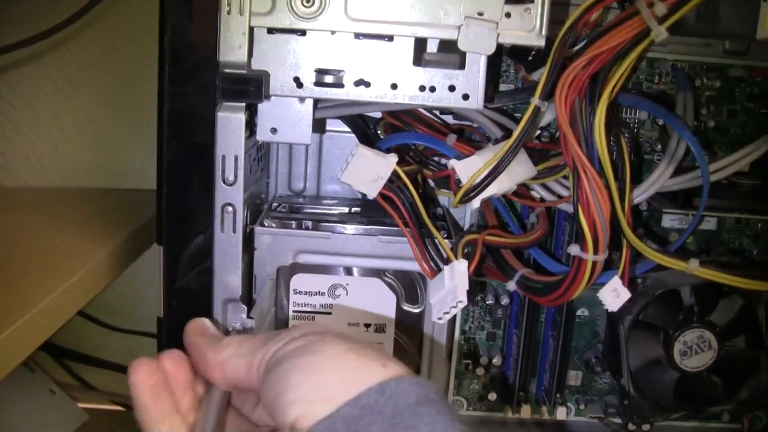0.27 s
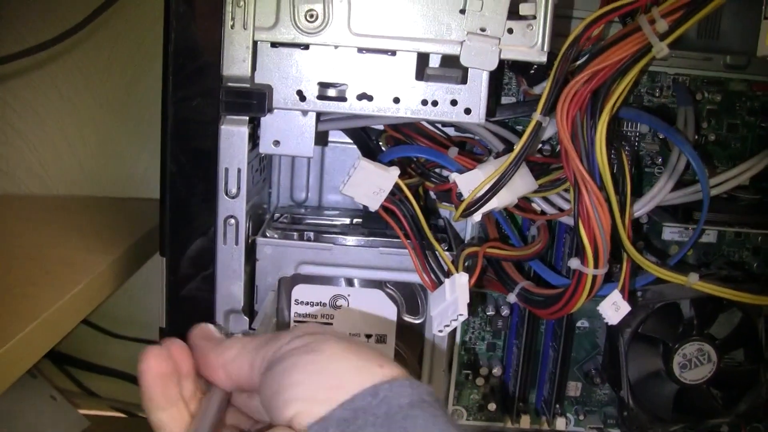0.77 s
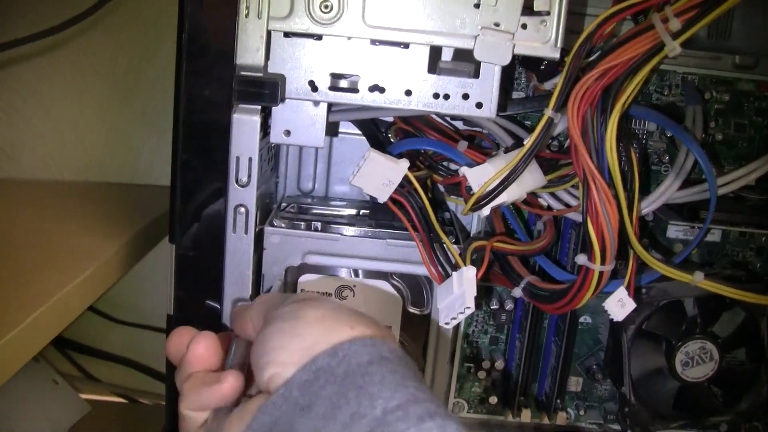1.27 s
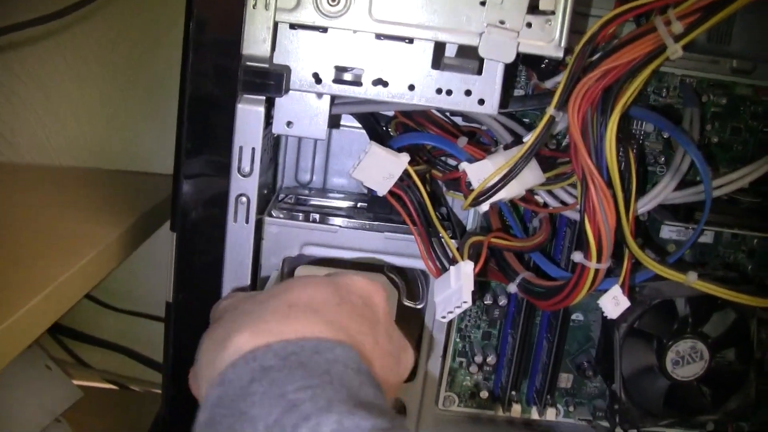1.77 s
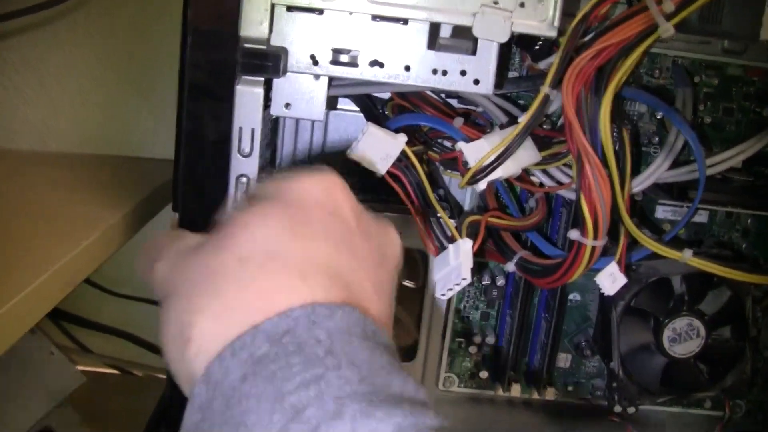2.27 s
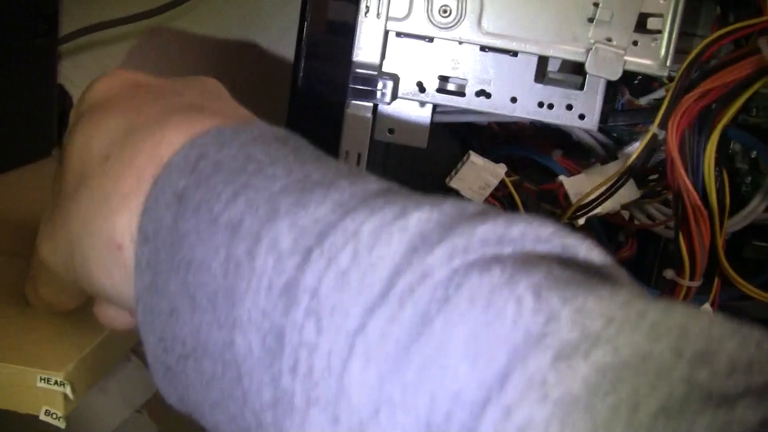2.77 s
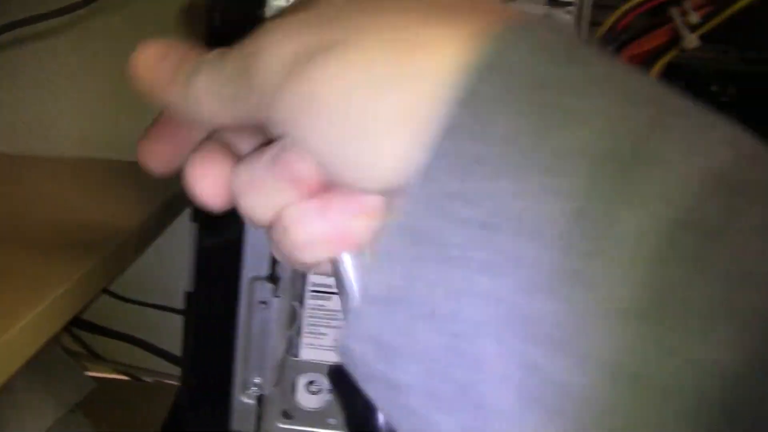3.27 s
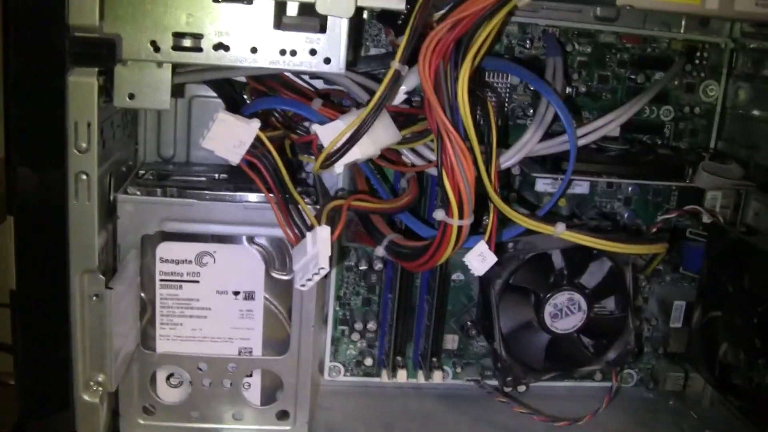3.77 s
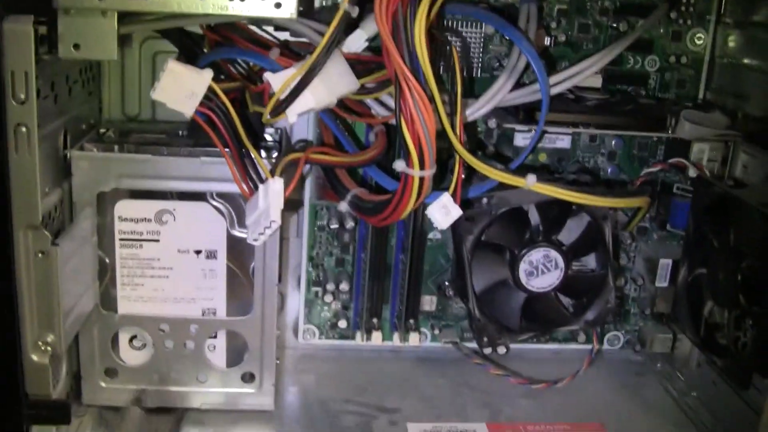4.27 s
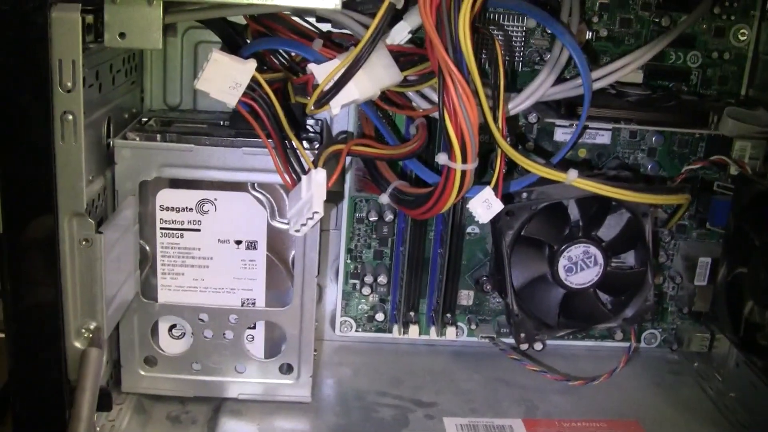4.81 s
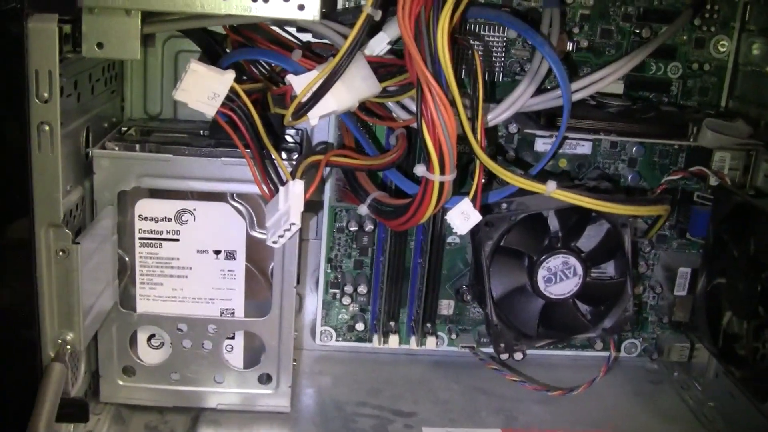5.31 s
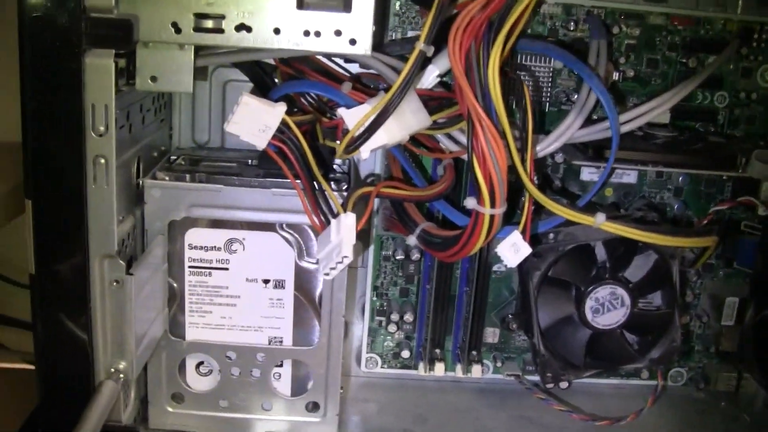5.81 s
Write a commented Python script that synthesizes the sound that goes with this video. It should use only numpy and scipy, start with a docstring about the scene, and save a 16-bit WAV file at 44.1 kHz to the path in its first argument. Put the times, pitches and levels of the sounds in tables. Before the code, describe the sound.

A screwdriver works at a screw inside an open steel computer case, over the faint steady air of a small room. For the first two seconds its tip clicks and scrapes irregularly, with soft rubbing and light knocks. A louder knock rings the sheet metal at about 1.8 seconds, and another follows at 2.1. Faint plastic ticks come next, and a desk creaks briefly just before 3 seconds. From about 3.3 to 4.4 seconds the camera is handled right at the microphone: its plastic housing gives a sharp, loud snap at 3.6, then crackles with a soft finger slide and a few tiny squeaks around 4.2. From 4.7 to 5.2 seconds the tool knocks on the case about four times with a short metallic ring. A few clicks follow around 5.5, then a dull bump, light scrapes and rubbing until about 6 seconds.

```python
"""Screwdriver in a steel computer case

In a small room, a screwdriver works at a screw in the drive cage of an open case. The tip clicks,
scrapes and slips; blows ring the sheet steel. A hand leans on the desk, which creaks by stick-slip.
The camera is moved: its plastic housing snaps and squeaks right at the microphones.
Then the tool knocks on the case again."""
import sys
import numpy as np
from scipy import signal
from scipy.fft import rfft, irfft, next_fast_len
from scipy.io import wavfile

SR = 44100
rng = np.random.default_rng(int(sys.argv[2]) if len(sys.argv) > 2 else 0)


def to_wav(sig):
    """Store sig (one row per channel, or 1-D mono) as 16-bit WAV at the path in sys.argv[1].

    Samples outside -1..1 are clipped; the rate is SR.
    """
    pcm = np.clip(np.atleast_2d(sig), -1, 1) * 32767
    pcm = np.round(pcm).astype(np.int16)
    wavfile.write(sys.argv[1], SR, pcm.T)  # frames by channels


N = 266805

# crossovers between four registers: bass, body, treble, top (frequency [Hz])
REGISTER_EDGES_HZ = (500, 2200, 8000)
# side channel of the microphone pair (frequency [Hz], gain [dB])
SIDE_EQ = [(30, -14), (100, -25), (500, -21), (1500, -17.5), (5000, -11.5), (8000, -7.5), (12000, -1.5)]
# room tone, and extra colour of its side channel (frequency [Hz], gain [dB])
ROOM_EQ = [(12, -37), (20, -28), (70, -20.5), (177, -9), (204, -12), (248, -6.5), (285, -14), (388, -8),
           (527, -11), (574, -11), (1220, -18), (1960, -21), (2390, -24), (5380, -28.5), (16000, -35.5)]
ROOM_SIDE_EQ = [(30, 2.4), (120, 6.7), (700, 10.5), (3000, 4.0), (10000, 6.3)]

# desk creaks (time [s], length [s], level [dB], fade [dB/s]; negative swells)
DESK_CREAKS = [(2.845, .02, -37.5, -200), (2.881, .048, -39, 150), (2.974, .045, -45.5, 80)]
# desk board (frequency [Hz], gain [dB])
DESK_EQ = [(60, -21), (250, -2), (800, -8), (1250, -1), (1900, -12), (2150, 7.5), (2650, -3.5), (3260, 0),
           (5000, -5), (8200, -12), (9500, -19.5), (16000, -50)]
# desk resonances (frequency [Hz], level [dB], t60 [s])
DESK_MODES = [(1205, -18.5, 0.16), (2096, -8.5, 0.11), (3150, -20, 0.03), (8000, -9, 0.037)]
# desk slip, row per register (level [dB], slope on extra strength [dB/dB])
CREAK_LAW = [(-54, 0.5), (-40.5, 1), (-36.5, 1.4), (-56.5, 3)]

# finger sliding on the housing (time [s], level [dB])
SLIDE_ENVELOPE = [(3.645, -51), (3.69, -50.5), (3.76, -49), (3.83, -56.5), (3.9, -51.5), (3.95, -64)]
# housing squeaks (time [s], length [s], frequency [Hz], level [dB])
HOUSING_SQUEAKS = [(4.139, 0.024, 3100, -35.5), (4.157, 0.014, 2840, -32.5), (4.169, 0.0207, 3030, -35.5),
                   (4.189, 0.018, 3050, -27), (4.347, 0.015, 5640, -36.5)]
# housing snaps (time [s], level [dB], hardness [dB], thump [dB], crackle length [s])
HOUSING_SNAPS = [(2.3426, -48.5, -15, 4, 0), (2.4626, -44.5, -1.5, -4, 0), (2.6213, -46.5, 1.5, -1, 0),
                 (2.7462, -49, -23, 0, 0), (3.3071, -48, -1, 5, 0), (3.402, -38.5, -4.5, 0.5, 0),
                 (3.4418, -42.5, -13, 2, 0), (3.477, -48.5, -23, 9, 0), (3.523, -41.5, -14, 1, 0),
                 (3.544, -49, -20, 8, 0), (3.6042, -53, -18, 12, .015), (3.6317, -19, 2.5, -2.5, 0),
                 (3.6364, -19.5, 4.5, -10, 0), (3.6393, -19.5, 4.5, -33, 0), (3.6966, -37, 16.5, -19, .05),
                 (3.7613, -41.5, 2, -30, .035), (3.8292, -39, 5.5, -5.5, .04), (3.8975, -40.5, -7, -22, 0),
                 (3.9111, -35, -1.5, -39, .015), (4.002, -38, 5, -41, 0), (4.0689, -41, -22, 8, 0),
                 (4.076, -35, -3.5, 3.5, .028), (4.1512, -34.5, -1, 6.5, 0), (4.161, -31, -1.5, 1, 0),
                 (4.1891, -36, -6, 3.5, 0), (4.1964, -32.5, 4.5, 6.5, 0), (4.244, -43.5, -6.5, 1, .02),
                 (4.3747, -46, -11, 6, 0)]
# housing snap, finger slide, squeak rasp (frequency [Hz], gain [dB])
HOUSING_EQ = [(40, -29), (230, -40), (330, -9.5), (560, 5), (900, 4.5), (1600, 4), (2300, -7), (3100, -6),
              (4200, -7.5), (5700, -4.5), (7500, -12), (11000, -12), (16000, -78)]
SLIDE_EQ = [(200, -8), (1500, 0.5), (4000, -4.5), (8000, -4), (12000, -6.5), (16000, -5.5)]
RASP_EQ = [(400, -13), (3300, 24), (4500, -6), (8000, -3), (11000, -26), (16000, -42)]
# housing resonances (frequency [Hz], level [dB], t60 [s])
HOUSING_MODES = [(635, -2, 0.057), (1730, -15, 0.006), (2130, 0, 0.053)]
# snap, row per register (offset [dB], hardness slope [dB/dB], thump slope [dB/dB])
SNAP_LAW = [(-1.5, 0, 1), (0, 0, 0), (0.5, 1, 0), (-16.5, 1.62, 1)]

# chassis resonances (frequency [Hz], level struck on frame [dB], level struck on cage [dB], t60 [s])
CHASSIS_MODES = [(138, -22, -6, .22), (180, -6, -18, .22), (203, -12, 5, .17), (225, -3, -16, .65),
                 (289, -9, 1, .5), (355, -10, -16, .3), (418, -14, -2, .17), (538, -6, -1, .16),
                 (682, -20, -8, .22), (754, 1, -14, .3), (820, -3, -2, .26), (904, -14, 0, .22),
                 (971, 1, -20, .22), (1232, 0, -9, .21), (1432, 1, -11, .19), (1530, -3, -10, .2),
                 (1608, -4, -20, .22), (1657, -3, -15, .22), (2165, -4, -6, .17), (2363, -15, -7, .24),
                 (3465, -10, -20, .17), (4630, -9, -22, .13), (4817, -7, -20, .12), (5020, -5, -18, .12),
                 (5297, -4, -15, .1), (5780, -14, -6, .08), (6962, -12, -28, .13)]
# dense panel modes (frequency [Hz], base t60 [s])
PANEL_DECAY = [(120, 0.27), (320, 0.25), (840, 0.18), (1600, 0.18), (2600, 0.1), (5800, 0.048),
               (10000, 0.069), (16000, 0.039)]
# front frame, drive cage, contact tick, rubbed case, rubbed shaft (frequency [Hz], gain [dB])
FRAME_EQ = [(40, -72), (100, -10), (180, 2), (400, -1), (590, 0.5), (640, -3), (760, -2), (1050, -1.5),
            (1500, -2.5), (1900, -10), (2800, -7), (5000, -5.5), (7200, -11.5), (9500, -14), (16000, -14.5)]
CAGE_EQ = [(40, -41), (90, 2), (135, -11), (210, 6), (255, -20), (310, 4.5), (520, -2), (900, -5),
           (1100, -11), (1600, -7.5), (3000, -9.5), (5800, -8.5), (8500, -32.5), (16000, -47)]
TICK_EQ = [(100, -35), (500, 24), (1500, 9), (3500, 7), (6500, -3), (8500, -10), (16000, -2.5)]
MURMUR_EQ = [(100, 15.5), (250, 2.0), (700, 9.0), (1500, -8.5), (3000, -2.5), (6000, -20), (15000, -17)]
SHAFT_EQ = [(500, 5), (3000, -23.0), (7000, 0), (11000, -13), (16000, 2.5)]
# fingers and tool rubbing the cage, two spells (time [s], relative level [dB])
RUB_ENVELOPES = [
    [(0.0, -40), (0.05, -57.5), (0.37, -40.5), (0.58, -44.5), (0.95, -47.5), (1.09, -39.5), (1.18, -51),
     (1.81, -47), (1.93, -71), (2.06, -45.5), (2.3, -99)],
    [(5.25, -70), (5.348, -55), (5.48, -54), (5.618, -49.5), (5.76, -47), (6.05, -60)],
]
# tip dragged over steel, and one slow finger rub at 2.035 s (time [s], length [s], relative level [dB],
# hardness [dB])
STEEL_SCRAPES = [(0.336, 0.03, -43.5, -21), (0.614, 0.019, -39.5, -28.5), (0.7, 0.018, -36.5, -5.5),
                 (0.834, 0.0158, -40, -7.5), (0.869, 0.017, -44, -12), (1.043, 0.014, -42.5, -12),
                 (1.097, 0.027, -42.5, -5), (1.718, 0.026, -41.5, -11), (1.7965, 0.0089, -40, 1.5),
                 (2.035, 0.077, -55.5, -3), (2.199, 0.008, -41.5, -3.5), (5.013, 0.029, -42, -3.5),
                 (5.031, 0.02, -40, 7), (5.16, 0.01, -43.5, 6), (5.437, 0.023, -40.5, -13),
                 (5.825, 0.037, -42.5, -18), (6.003, 0.024, -45.5, -22)]
# scrape, row per register (offset [dB], hardness slope [dB/dB])
SCRAPE_LAW = [(-9.5, -0.01), (-0.5, 0), (2, 1.5), (-20.5, 1.2)]
# hand bumping the case (time [s], relative level [dB])
HAND_BUMPS = [(0.859, -43.5), (4.926, -47), (5.361, -46), (5.659, -37.5), (5.689, -56), (5.735, -49)]
# bump, per register (offset [dB])
BUMP_OFFSETS_DB = (0, -13, -25, -29)
# tip clicking in the screw head (time [s], level [dB])
TIP_CLICKS = [(0.1428, -45), (0.2007, -40.5), (0.2934, -39), (0.628, -40.5), (0.812, -42), (0.8929, -38.5),
              (0.9857, -46), (1.0184, -44), (1.723, -43.5), (5.4022, -42.5), (5.4509, -33.5), (5.48, -40.5),
              (5.4966, -30)]
# tip click, row per register (level [dB], slope on extra strength [dB/dB])
TIP_LAW = [(-48, 0.12), (-39.5, 1), (-52, 1.52), (-84, -1)]
# blows on the chassis (time [s], level [dB], hardness [dB], place [0 front frame to 1 drive cage])
CHASSIS_KNOCKS = [(0.4454, -31.5, -1.5, 0.36), (0.7327, -33.5, 3, 0.4), (1.324, -31, -2.5, 0.087),
                  (1.396, -35.5, -5, 0.045), (1.4614, -37, 1, 0.15), (1.8034, -18.5, -2, 1),
                  (1.9011, -34, -7, 0.52), (2.0873, -24.5, -1, 0.67), (2.0918, -34.5, 4, 0.73),
                  (2.102, -39, 10.5, 0.37), (2.215, -51, 2, 0.92), (4.7168, -22.5, 5, 0.027),
                  (4.782, -41.5, 14.5, 0.025), (4.8137, -24, 0, 0.084), (5.039, -43, 13, .02),
                  (5.1171, -24, 2, .02), (5.1753, -25.5, -6.5, 0.097)]
# knock, row per register (offset [dB], hardness slope [dB/dB], gain on cage [dB])
KNOCK_LAW = [(-10.5, -0.46, 8), (-0.5, 0, 1), (0.5, 1, -2), (-13.5, 1.08, 16.5)]


def amp(db):
    """Decibels to gain."""
    return np.exp(np.maximum(db, -300) * (np.log(10) / 20))


def unit(x):
    """Scale to rms 1."""
    return x / np.sqrt(np.mean(x ** 2) + 1e-20)


def lookup(points, hz):
    """Interpolate on a log-frequency axis."""
    points_hz, values = np.transpose(points)
    return np.interp(np.log(hz + 1), np.log(points_hz + 1), values)


def add(mix, start_s, sound):
    """Mix in a two-channel sound."""
    part = mix[:, max(round(start_s * SR), 0):][:, :sound.shape[1]]
    part += sound[:, :part.shape[1]]


def colour(x, eq):
    """Minimum-phase filter."""
    size = next_fast_len(x.shape[-1] + 4096)
    log_gain = np.log(amp(lookup(eq, abs(np.fft.fftfreq(size, 1 / SR)))))
    response = np.exp(np.conj(signal.hilbert(log_gain)))[:size // 2 + 1]
    return irfft(rfft(x, size) * response, size)[..., :x.shape[-1]]


def noise(size, eq):
    """Coloured mid/side noise at rms 1."""
    return unit(colour(rng.standard_normal((2, size)), eq))


def split(x, edges_hz, order=4):
    """Adjoining bands that sum to the whole."""
    size = next_fast_len(x.shape[-1] + 1024)
    hz = np.fft.rfftfreq(size, 1 / SR)
    lowpasses = [1 / (1 + (hz / edge_hz) ** (2 * order)) for edge_hz in edges_hz]
    bandpasses = np.diff(lowpasses, axis=0, prepend=0, append=1)
    return irfft(bandpasses[:, None] * rfft(x, size), size)[..., :x.shape[-1]]


def ring(modes, t):
    """Decaying mid/side sines at random phases."""
    phases = rng.random((len(modes), 2, 1))
    return sum(amp(db - 60 * t / t60_s) * np.sin(2 * np.pi * (hz * t + phase))
               for (hz, db, t60_s), phase in zip(modes, phases))


def registers(law, *controls):
    """Four register levels in dB, linear in the controls."""
    return np.array(law) @ [1, *controls]


def voiced(sound, levels_db, span_s):
    """Set each register's rms over the onset."""
    bands = split(sound, REGISTER_EDGES_HZ)
    onset = np.exp(-(np.arange(sound.shape[1]) / (span_s * SR)) ** 2)
    rms = np.sqrt(bands[:, 0] ** 2 @ onset / (span_s * SR))
    return np.tensordot(amp(levels_db) / rms, bands, 1)


def micro_slips(size, rate_hz, spread_db):
    """Random train of tiny friction impulses."""
    fires = rng.random(size) < rate_hz / SR
    heights = amp(spread_db * np.minimum(rng.exponential(1, size), 3))
    return fires * heights * rng.choice([-1, 1], size)


def stick_slip(length_s, gap_s, jitter, scatter_db, count=8):
    """Unevenly spaced slips, the first at zero (delay [s], offset [dB])."""
    gap_draws, level_draws = rng.standard_normal((2, count))
    gaps_s = gap_s * np.exp(jitter * gap_draws)
    delays_s = np.cumsum(gaps_s) - gaps_s[0]
    return [(s, db) for s, db in zip(delays_s, scatter_db * level_draws) if s <= length_s]


def microphones(mid_side, side_db, balance_db, low_cut_hz=100, order=2):
    """Two close ports with a low cut: alike in the bass, parting in the treble."""
    low_cut = signal.butter(order, low_cut_hz, "highpass", fs=SR, output="sos")
    mid, side = signal.sosfilt(low_cut, mid_side)
    side = amp(side_db) * colour(side, SIDE_EQ)
    return np.array([(mid + side) * amp(balance_db / 2), (mid - side) * amp(-balance_db / 2)])


def room_tone(level_db=-55.5, side_db=-7):
    """Steady room air and microphone hiss, left and right."""
    mid, side = amp(level_db) * noise(N, ROOM_EQ)
    side = amp(side_db) * colour(side, ROOM_SIDE_EQ)
    return np.array([mid + side, mid - side])


def desk_creaks(t60_s=0.05, rise_s=0.0011, modes_db=-3, usual_db=-40):
    """The desk gives in runs of slips, each ringing the same board."""
    out, t = np.zeros((2, N)), np.arange(SR // 6) / SR
    board = noise(len(t), DESK_EQ) * amp(-60 * t / t60_s) + amp(modes_db) * ring(DESK_MODES, t)
    board *= 1 - np.exp(-t / rise_s)
    for start_s, length_s, db, fade_db_per_s in DESK_CREAKS:
        for delay_s, offset_db in stick_slip(length_s, gap_s=0.0127, jitter=0.16, scatter_db=1.5):
            extra_db = db + offset_db - fade_db_per_s * delay_s - usual_db
            add(out, start_s + delay_s, voiced(board, registers(CREAK_LAW, extra_db), span_s=0.0058))
    return out


def finger_slide():
    """Skin brushing plastic: a fine hiss."""
    times_s, db = np.transpose(SLIDE_ENVELOPE)
    return noise(N, SLIDE_EQ) * np.interp(np.arange(N) / SR, times_s, amp(db), left=0, right=0)


def housing_squeaks(width_hz=200, rasp_db=-9):
    """The grip slides briefly; friction drives one housing resonance."""
    out = np.zeros((2, N))
    for start_s, length_s, hz, db in HOUSING_SQUEAKS:
        friction = rng.standard_normal((2, int(length_s * SR)))
        tone = unit(signal.lfilter(*signal.iirpeak(hz, hz / width_hz, fs=SR), friction))
        rasp = amp(rasp_db) * unit(colour(friction, RASP_EQ))
        add(out, start_s, amp(db) * np.hanning(friction.shape[1]) * (tone + rasp))
    return out


def plastic_snap(levels_db, t60_s=0.0014, tail_t60_s=0.052, tail_db=-18, modes_db=-27, firm_db=-29):
    """One snap carried through the housing; harder is brighter and drier."""
    t = np.arange(SR // 10) / SR
    force_db = levels_db[2] - firm_db  # from the treble register
    ring_gain = amp(-0.66 * max(force_db, 0))
    decay = amp(-60 * t / t60_s) + ring_gain * amp(tail_db - 60 * t / tail_t60_s)
    cutoff_hz = np.clip(4200 * amp(0.51 * force_db), 2500, 15000)
    crack = colour(rng.standard_normal((2, len(t))) * decay, HOUSING_EQ)
    crack = signal.lfilter(*signal.butter(2, cutoff_hz, fs=SR), crack)
    modes = ring_gain * amp(modes_db) * ring(HOUSING_MODES, t)
    return voiced(crack / abs(crack[0]).max() + modes, levels_db, span_s=0.0031)


def housing_snaps(crackle_db=-4, fade_db_per_s=50, relief_db_per_db=0.92):
    """Gripped plastic snaps, at times settling in a crackle; a hard snap leaves less strain for it."""
    out = np.zeros((2, N))
    for start_s, db, hard_db, thump_db, crackle_s in HOUSING_SNAPS:
        levels_db = db + registers(SNAP_LAW, hard_db, thump_db)
        add(out, start_s, plastic_snap(levels_db))
        for delay_s, offset_db in stick_slip(crackle_s, gap_s=0.01, jitter=0.058, scatter_db=2.5)[1:]:
            drop_db = crackle_db - relief_db_per_db * max(hard_db, 0) - fade_db_per_s * delay_s
            add(out, start_s + delay_s, plastic_snap(levels_db + offset_db + drop_db))
    return out


def chassis(ring_factor, build_s, place, modes_db=-14, late_db=-26, late_factor=3.87):
    """Struck sheet steel: bending waves bring the treble first, then the bass swells."""
    t = np.arange(SR // 2) / SR
    edges_hz = np.geomspace(150, 12000, 9)
    centres_hz = np.geomspace(115, 15500, 10)[:, None, None]
    rise_s = max(build_s, 0.0002) / (1 + (centres_hz / 3000) ** 4)
    swell = 1 - np.exp(-(t / rise_s) ** 2)
    t60_s = lookup(PANEL_DECAY, centres_hz) * ring_factor
    shimmer_db = place * 1.5 * np.log2(centres_hz / 1800)  # the thin cage keeps a late treble ring
    decay = amp(-60 * t / t60_s) + amp(late_db + shimmer_db - 60 * t / (t60_s * late_factor))
    bands = split(noise(len(t), CAGE_EQ if place > 0.5 else FRAME_EQ), edges_hz)
    modes = [(hz, frame_db + place * (cage_db - frame_db), ring_s)
             for hz, frame_db, cage_db, ring_s in CHASSIS_MODES]
    return (bands * swell * decay).sum(0) + amp(modes_db) * ring(modes, t) * swell[0]


def rubbing(murmur_db=-3, hiss_db=-20):
    """Soft friction keeps the case murmuring; fingers hiss on the tool shaft."""
    t, force = np.arange(N) / SR, np.zeros(N)
    for envelope in RUB_ENVELOPES:
        times_s, db = np.transpose(envelope)
        force += np.interp(t, times_s, amp(db), left=0, right=0)
    grains = unit(micro_slips(N, rate_hz=500, spread_db=7.5)) * force
    panels = colour(chassis(ring_factor=0.63, build_s=0.00086, place=0.2, modes_db=-17), MURMUR_EQ)
    murmur = signal.fftconvolve(grains[None], panels / np.linalg.norm(panels[0]))[:, :N]
    return amp(murmur_db) * murmur + amp(hiss_db) * force * noise(N, SHAFT_EQ)


def stroke(length_s):
    """A short run of slips excites the steel."""
    size = int(length_s * SR)
    friction = micro_slips(SR // 8, rate_hz=2000, spread_db=3.0) + 0.02 * rng.standard_normal(SR // 8)
    burst = friction[:size] * signal.windows.tukey(size, 0.5)
    return signal.fftconvolve(chassis(ring_factor=0.68, build_s=0.0011, place=0.4), burst[None])


def scrapes_and_bumps(gain_db=-1, span_s=0.018, bump_s=0.0154):
    """The tip drags over the steel, and a finger rubs it once; the hand brushes it with dull bumps."""
    out = np.zeros((2, N))
    for start_s, length_s, db, hard_db in STEEL_SCRAPES:
        add(out, start_s, voiced(stroke(length_s), db + registers(SCRAPE_LAW, hard_db), span_s))
    for start_s, db in HAND_BUMPS:
        add(out, start_s, voiced(stroke(bump_s), db + np.array(BUMP_OFFSETS_DB), span_s))
    return amp(gain_db) * out


def contact_tick(size, t60_s=0.0047):
    """Dry tick of the contact, before the panels answer."""
    t = np.arange(size) / SR
    return colour(rng.standard_normal((2, size)) * amp(-60 * t / t60_s), TICK_EQ)


def tip_clicks(tick_db=5, usual_db=-40):
    """Light contacts in the screw head, more tick than ring; firmer ones gain treble."""
    out = np.zeros((2, N))
    for start_s, db in TIP_CLICKS:
        panels = chassis(ring_factor=0.83, build_s=0.00092, place=0.45)
        click = panels + amp(tick_db) * contact_tick(panels.shape[1])
        add(out, start_s, voiced(click, registers(TIP_LAW, db - usual_db), span_s=0.015))
    return out


def chassis_knocks(tick_db=-10.5):
    """Tool and drive strike the chassis; hard, glancing blows build more slowly and ring shorter."""
    out = np.zeros((2, N))
    for start_s, db, hard_db, place in CHASSIS_KNOCKS:
        ring_factor = np.interp(place, [0, 1], [1.0, 0.65])  # the loaded cage is damped
        ring_factor *= amp(-0.1475 * hard_db)
        build_s = np.interp(place, [0, 1], [0.0042, 0.00068]) * amp(1.22 * hard_db)
        panels = chassis(ring_factor, build_s, place)
        knock = panels + amp(tick_db) * contact_tick(panels.shape[1])
        add(out, start_s, voiced(knock, db + registers(KNOCK_LAW, hard_db, place), span_s=0.0088))
    return amp(0) * out


def scene():
    """Case, desk and camera over the room tone."""
    room = room_tone()
    steel = chassis_knocks() + tip_clicks() + scrapes_and_bumps() + rubbing()
    case = microphones(steel, side_db=3.0, balance_db=0.03, low_cut_hz=118, order=4)
    desk = microphones(desk_creaks(), side_db=4.5, balance_db=1.8)
    plastic = finger_slide() + housing_snaps() + housing_squeaks()
    camera = microphones(plastic, side_db=-1.5, balance_db=0.8)
    return room + desk + camera + case


def record(dry, cutoff_hz=16100):
    """Full-scale clipping, then a low-pass."""
    lowpass = signal.firwin(255, cutoff_hz, window=("kaiser", 9), fs=SR)
    return signal.oaconvolve(np.clip(dry, -1, 1), lowpass[None], "same")


dry = scene()
out = record(dry)
to_wav(out)
```